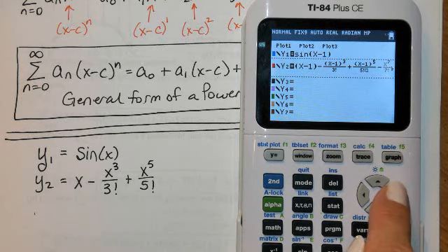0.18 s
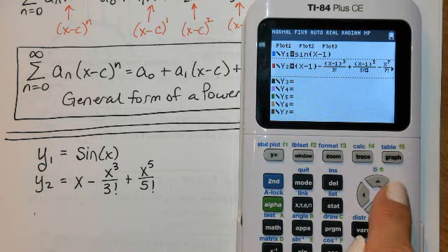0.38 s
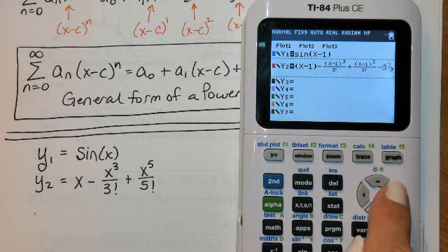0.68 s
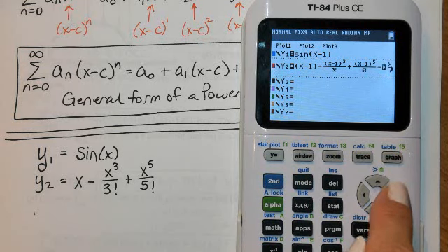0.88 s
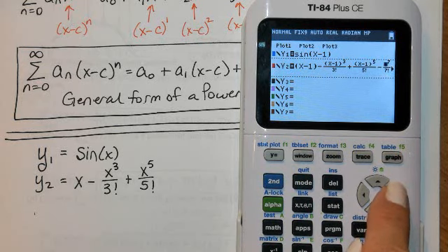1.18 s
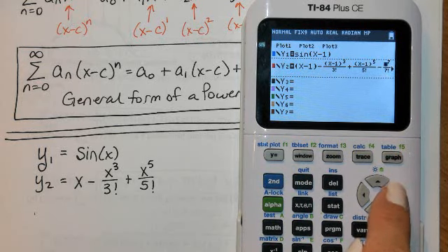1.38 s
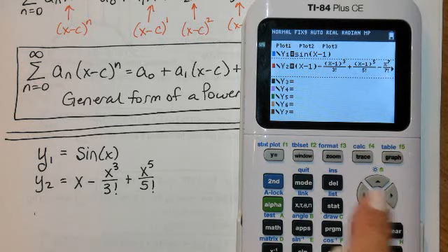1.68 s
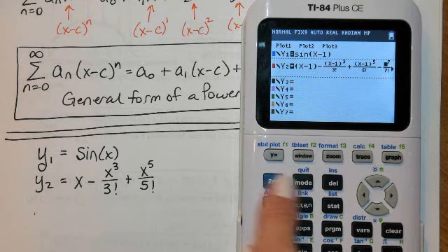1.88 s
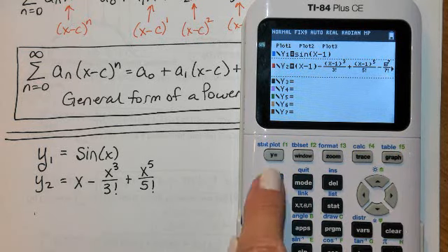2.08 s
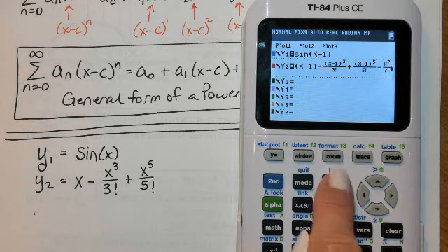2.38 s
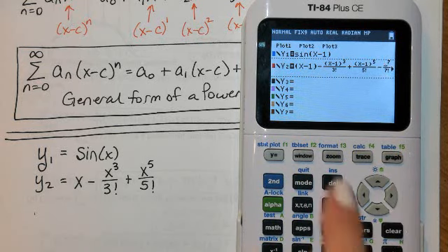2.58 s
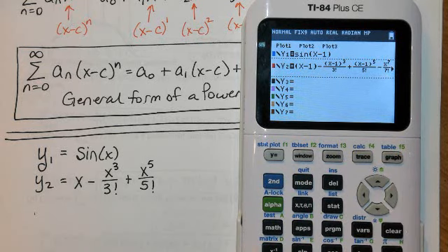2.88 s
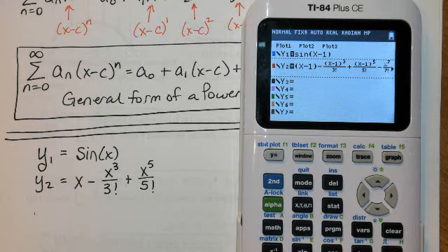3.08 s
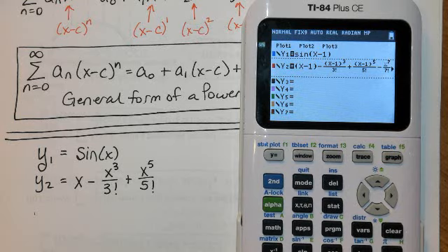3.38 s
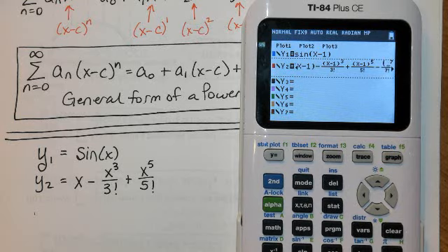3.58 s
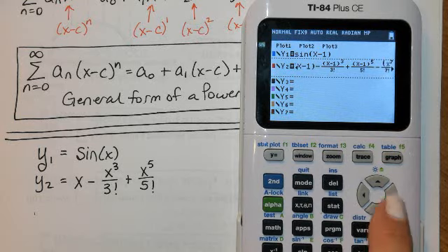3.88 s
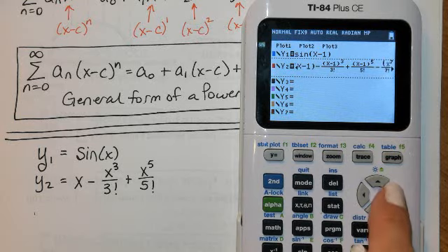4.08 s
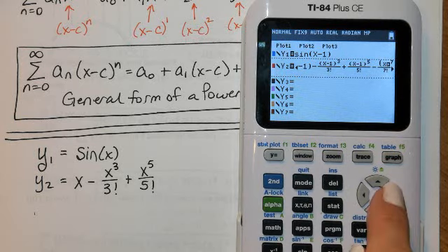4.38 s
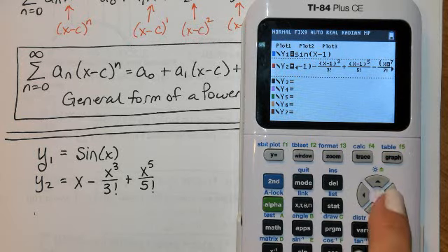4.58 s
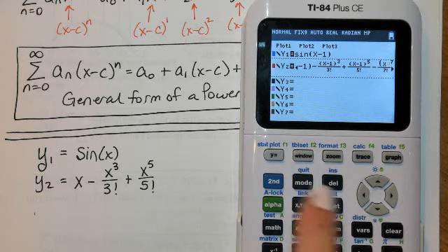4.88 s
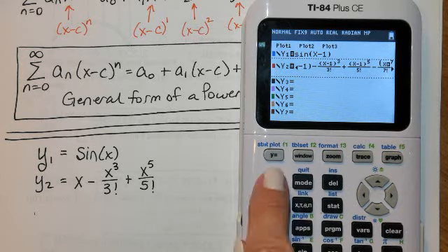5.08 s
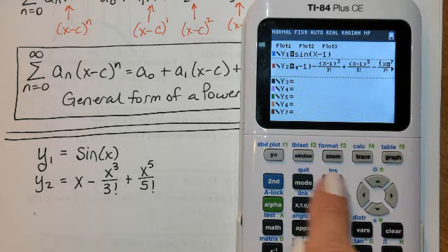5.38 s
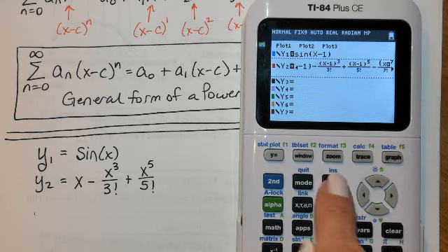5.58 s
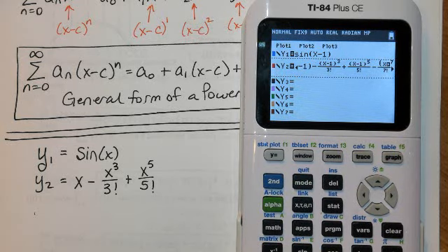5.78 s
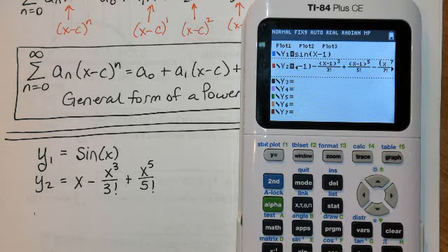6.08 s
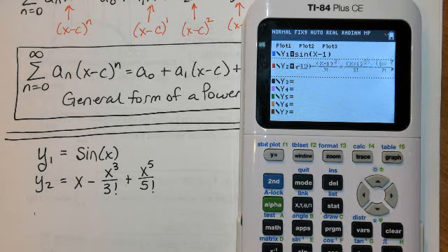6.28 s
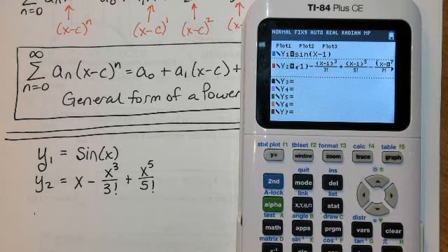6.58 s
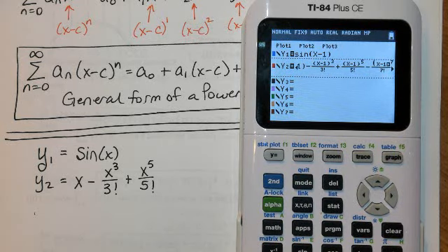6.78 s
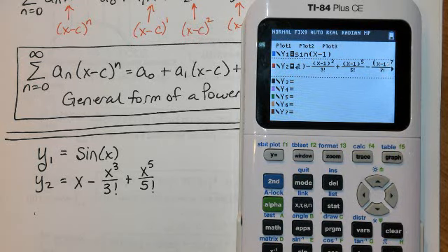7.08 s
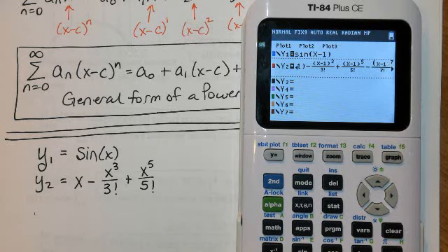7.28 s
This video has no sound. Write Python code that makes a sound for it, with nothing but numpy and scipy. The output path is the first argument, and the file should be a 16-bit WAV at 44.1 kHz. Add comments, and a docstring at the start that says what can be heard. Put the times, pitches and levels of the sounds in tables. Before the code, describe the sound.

Irregular plastic clicks of calculator keys, two of them sharp snaps, with soft desk bumps over a low room hum.

```python
"""A thumb works a plastic calculator lying on paper on a desk, heard through a narrow-band microphone.
Ventilation rumbles and mains power hums in the small room throughout. First the arrow pad clicks lightly.
At 2.6 s a key springs back hard: it snaps, rings its cap and knocks the hollow case as the desk is bumped.
More light clicks follow, then a second firm snap at 5.6 s. At the end the hand brushes the paper,
bumps the desk once more and rocks a few keys in their seats."""
import sys
import numpy as np
from scipy import signal
from scipy.fft import rfft, irfft
from scipy.io import wavfile
from scipy.ndimage import uniform_filter1d

SR = 44100
rng = np.random.default_rng(int(sys.argv[2]) if len(sys.argv) > 2 else 0)


def wrap_up_sound(samples):
    """Save the sound to the file named by the first command line argument, as 16-bit audio."""
    columns = np.atleast_2d(samples).T
    # keep every value between -1 and 1, then stretch to whole-number steps
    tamed = np.clip(columns, -1, 1)
    steps = np.round(tamed * 32767).astype(np.int16)
    wavfile.write(sys.argv[1], SR, steps)


N = 326727

# ventilation rumble and microphone hiss: (frequency [Hz], level [dB per Hz])
AIR_SPECTRUM = [(8, -45.5), (22, -55.5), (31, -66), (45, -64), (54, -61.5), (63, -73.5), (75, -75.5),
                (110, -78.5), (165, -78.5), (270, -87.5), (430, -90), (650, -94), (1500, -98),
                (2100, -99.6), (5000, -99.3), (7500, -99.8), (12000, -115)]
# the hand bumps the desk: (time [s], pitch [Hz], level [dB])
DESK_BUMPS = [(1.218, 189, -52), (2.596, 181, -40.5), (2.596, 344, -41.5), (2.674, 110, -39),
              (4.28, 124, -43.5), (5.09, 233, -46), (5.492, 244, -37), (5.635, 147, -42.5),
              (6.238, 129, -33)]
# skin slides over paper and keys: (middle time [s], length [s], centre [Hz], width [Hz], level [dB])
SKIN_BRUSHES = [(2.406, 0.11, 4460, 6000, -54), (4.96, 0.12, 480, 90, -56.5), (4.944, 0.081, 233, 100, -54),
                (4.948, 0.071, 1490, 2500, -58.5), (5.283, 0.056, 4000, 5000, -48.5),
                (6.238, 0.067, 3530, 4500, -53), (6.397, 0.033, 2830, 2980, -54),
                (6.601, 0.066, 1300, 900, -60.5), (6.743, 0.13, 3000, 5000, -60)]
# the four parts of a click, a row each for snap, bright ring, key cap and case: (low [Hz], high [Hz])
PART_BANDS = [(3900, 6400), (6400, 7400), (1800, 3900), (400, 1800)]
# the tones the calculator rings with: (pitch [Hz], relative level [dB], time to fade by 60 dB [s])
RING_TONES = [(466, -1, 0.033), (616, -5, 0.024), (811, -2.5, 0.015), (957, -1.5, 0.057), (1100, -8, 0.045),
              (1280, -5, .022), (1430, -2.5, 0.027), (1730, -3.5, 0.034), (2283, -2, 0.024),
              (2630, -5, 0.023), (3076, -5, 0.04), (3487, -0.5, 0.032), (4200, 2.5, 0.014),
              (4540, -6, 0.017), (4950, -2, 0.025), (5370, -2.5, 0.023), (5650, -2.5, 0.018),
              (6190, -8, 0.045), (6780, -4.5, 0.027), (7060, -11, 0.039)]
# the thumb lands on keys and rocks them: (time [s], level [dB])
KEY_TOUCHES = [(2.392, -52), (2.406, -52), (2.4142, -53.5), (3.6057, -53), (6.232, -50), (6.2374, -53),
               (6.3907, -41.5), (6.603, -55), (6.705, -60)]
# a key meets its stop and knocks the case:
# (time [s], level [dB], pitch [Hz], cap gain [dB], treble gain [dB], gain below the pitch [dB])
CASE_KNOCKS = [(0.688, -52.5, 1330, -0.5, -3, -4.5), (2.596, -42, 1200, 6, 5, -1.5),
               (3.615, -53, 1390, 4, 7.5, -1.5), (4.2719, -47.5, 1250, -6, -13, -0.5),
               (4.2762, -52, 1050, -12, -19, -3), (5.282, -55, 1390, -9.5, -21, -3),
               (5.477, -49, 950, -22, -22, 0), (5.4966, -46, 920, -2, -12, -3),
               (5.634, -42, 960, 11.5, -6, -6), (6.766, -57.5, 750, -1, 4, -6)]
# light clicks, mostly of the arrow pad: (time [s], level [dB], tick over the ring [dB], cap gain [dB])
LIGHT_CLICKS = [(.0052, -43.5, 11, 1.5), (0.2446, -39.5, 3.5, -0.5), (0.519, -40.5, 4, -2.5),
                (.765, -47.5, 0, 0), (0.7672, -42.5, 6.5, -1.5), (1.213, -47.5, -9, -4.5),
                (1.2207, -44, 5, -2.5), (1.2545, -51, 0, -3), (4.27, -45.5, -5, -11), (4.496, -53, 7, 0),
                (4.5096, -50.5, 4, -7), (5.0888, -45, -4, -5), (5.4753, -48, 0, -12)]
# a key springs back up and rebounds once:
# (time [s], level [dB], knock pitch [Hz], lowest snap pitch [Hz], rebound delay [s], rebound level [dB])
KEY_RELEASES = [(2.2011, -42.5, 1250, 3940, 0.018, -50.5), (2.5987, -26, 1100, 4500, 0.0094, -44),
                (5.2803, -40.5, 1380, 3780, .0185, -50), (5.6363, -31, 930, 4510, 0.0082, -44)]

# the mix of parts in each kind of contact: (snap [dB], bright ring [dB], key cap [dB], case [dB])
TOUCH_MIX = (2, -2.5, -8, -8.5)
KNOCK_MIX = (-8.5, -11.5, -5.5, 2.5)
ARROW_MIX = (0.5, -2.5, -4.5, -18)
RELEASE_MIX = (5, 8, -13, -14.5)
REBOUND_MIX = (1.5, 2, -15.5, -6)


def gain(db):
    """Turn decibels into a number to multiply by."""
    return 10 ** (np.asarray(db) / 20)


def seconds(length):
    """The time of each sample in a short sound."""
    return np.arange(int(length * SR)) / SR


def fade(t, fade_s):
    """Die away smoothly, 60 dB down after fade_s."""
    return np.exp(-np.log(1000) * t / fade_s)


def band(x, low_hz, high_hz, order=2):
    """Let through the frequencies between two limits."""
    sections = signal.butter(order, [low_hz, min(high_hz, .45 * SR)], "band", fs=SR, output="sos")
    return signal.sosfilt(sections, x)


def unit_energy(x):
    """Scale a short sound to an energy of one."""
    return x / np.sqrt(np.sum(x ** 2))


def drift(rate_hz):
    """A slow random wander around zero."""
    step = int(SR / rate_hz)
    return 1.64 * uniform_filter1d(np.repeat(rng.standard_normal(N // step + 1), step), step)[:N]


def add(track, start, sound):
    """Mix a sound into the track at a time in seconds."""
    i = max(int(start * SR), 0)
    track[i:i + len(sound)] += sound[:N - i]


def shape_tone(x, curve, size=8192):
    """Filter along (frequency [Hz], gain [dB]) points, keeping the start sharp (minimum phase)."""
    hz, db = np.transpose(sorted(curve))
    bin_hz = np.maximum(np.arange(size // 2 + 1) * SR / size, 1)
    cepstrum = irfft(np.log(gain(np.interp(np.log(bin_hz), np.log(hz), db))))
    cepstrum[1:size // 2] *= 2
    cepstrum[size // 2 + 1:] = 0  # nothing may ring before the hit
    return irfft(rfft(x, size) * np.exp(rfft(cepstrum)))[:len(x)]


def ventilation(swell_db=0.96, split_hz=600):
    """Moving air rumbles and swells a little, under a steady microphone hiss."""
    hz, db = np.transpose(AIR_SPECTRUM)
    bin_hz = np.maximum(np.arange(N // 2 + 1) * SR / N, 1)
    bin_db = np.interp(np.log(bin_hz), np.log(hz), db)
    spectrum = rfft(rng.standard_normal(N)) * gain(bin_db) * np.sqrt(SR / 2)
    low_share = 1 / (1 + (bin_hz / split_hz) ** 2)
    rumble = irfft(spectrum * low_share, N)
    hiss = irfft(spectrum * (1 - low_share), N)
    return rumble * gain(swell_db * drift(6.7)) + hiss


def hum(mains_hz=60.02, slip_hz=0.915, mains_db=-48.5, motor_db=-56.5):
    """Mains hum and a slightly slower motor slide in and out of step, so the sum slowly throbs."""
    t = np.arange(N) / SR - 0.25  # roughly in step at 0.25 s
    mains = gain(mains_db) * np.sin(2 * np.pi * mains_hz * t)
    motor = gain(motor_db) * np.sin(2 * np.pi * (mains_hz - slip_hz) * t + 0.31 * drift(1.1))
    return np.sqrt(2) * (mains + motor)


def room(x, echo_db=-22.5, fade_s=0.13, build_s=0.011):
    """The desk and near walls add a short, blurred echo."""
    t = seconds(.35)
    build_up = np.clip(t / build_s - .5, 0, 1)
    echo = band(rng.standard_normal(len(t)), 350, 8000, order=1) * fade(t, fade_s) * build_up
    return x + gain(echo_db) * signal.fftconvolve(x, unit_energy(echo))[:N]


def desk_bumps(push_s=0.0091, fade_cycles=16.7):
    """A soft hand pushes slowly, so the desk answers only with a low tone."""
    out, t = np.zeros(N), seconds(.3)
    push = 1 - np.exp(-t / push_s)
    for start, hz, db in DESK_BUMPS:
        add(out, start, gain(db) * np.sin(2 * np.pi * hz * t) * fade(t, fade_cycles / hz) * push)
    return out


def skin_brushes(grain_db=3.5):
    """Sliding skin makes a swell of tiny slips of uneven size."""
    out = np.zeros(N)
    for middle, length, hz, width, db in SKIN_BRUSHES:
        count = int(length * SR)
        slips = rng.standard_normal(count) * gain(grain_db * rng.exponential(size=count))
        low_hz = np.hypot(hz, width / 2) - width / 2
        rub = band(slips, low_hz, low_hz + width)
        add(out, middle - length / 2, gain(db) * rub / rub.std() * np.hanning(count))
    return out


def rattle(grain_db=6.0, rise_s=0.008, fade_s=0.24):
    """Loose keys shiver in the case: many tiny contacts that die away."""
    t = seconds(.25)
    contacts = rng.standard_normal(len(t)) * gain(grain_db * rng.exponential(size=len(t)))
    grains = band(contacts, 550, 6200, order=1)
    return grains / grains.std() * fade(t, fade_s) * (1 - np.exp(-t / rise_s))


def plastic_ring(t, detune=0.014, scatter_db=1.5):
    """Struck plastic rings with many short tones, a little different on every hit."""
    hz, db, fade_s = np.transpose(RING_TONES)
    shift, strength, direction = rng.standard_normal((3, len(hz)))
    waves = np.sin(2 * np.pi * np.outer(hz * (1 + detune * shift), t))
    sizes = np.sign(direction) * gain(db + scatter_db * strength)
    tones = sizes[:, None] * waves * fade(t, fade_s[:, None])
    ring = np.zeros(len(t))
    for low, high in PART_BANDS:
        part = tones[(hz >= low) & (hz < high)].sum(axis=0)
        ring += unit_energy(part) * np.sqrt(2 * (high - low) / SR)  # wider bands get more energy
    return ring


def key_hit(tick_db, buckle_s=0.00079, grit_db=-3.0):
    """A hard tick, a burst of grit as the springy dome under the key buckles, and the ring after it."""
    t = seconds(.08)
    tick = gain(tick_db) * signal.unit_impulse(len(t))
    ring = plastic_ring(t)
    swell_s = buckle_s * gain(-0.34 * tick_db)  # a blunt contact buckles more slowly
    grit = gain(grit_db) * unit_energy(rng.standard_normal(len(t)) * t * np.exp(-t / swell_s))
    combined_size = np.sqrt(1 + gain(tick_db) ** 2 + gain(grit_db) ** 2)
    return (ring + tick + grit) / combined_size


def click(mix_db, knock_hz, snap_hz, tick_db, knock_db=5.0, below_knock_db=-4.0,
          valley_db=-4.5, cap_peak_db=1.5, snap_edge_db=3.0):
    """One key hit with its own tone: where the thumb sits decides how strongly each part answers."""
    widths_hz = np.diff(PART_BANDS)[:, 0]
    snap, bright, cap, case = np.asarray(mix_db) + 10 * np.log10(SR / 2 / widths_hz)
    curve = [
        (100, case - 14), (330, case - 7),
        (0.72 * knock_hz, case + below_knock_db), (knock_hz, case + knock_db),
        (1800, min(case, cap) + valley_db),  # valley between case and cap
        (2300, cap - cap_peak_db), (3000, cap + cap_peak_db), (3500, cap),
        (max(0.83 * snap_hz, 3600), min(cap, snap) - 10),  # valley between cap and snap
        (snap_hz, snap + snap_edge_db), (5500, snap), (6300, snap),
        (6900, bright), (7400, bright), (9000, bright - 9), (10800, bright - 9), (13000, bright - 36)]
    return shape_tone(key_hit(tick_db), curve) * np.sqrt(.005 * SR)  # level as if spread over 5 ms


def key_touches():
    """Keys rock under the thumb with broad, loose clicks."""
    out = np.zeros(N)
    for start, db in KEY_TOUCHES:
        add(out, start, gain(db) * click(TOUCH_MIX, knock_hz=1420, snap_hz=4590, tick_db=-1.5))
    return out


def case_knocks():
    """A key meets its stop and knocks the hollow case; hard contacts add more cap and treble."""
    out = np.zeros(N)
    snap, bright, cap, case = KNOCK_MIX
    for start, db, knock_hz, cap_db, treble_db, body_db in CASE_KNOCKS:
        mix_db = (snap + treble_db, bright + treble_db, cap + cap_db, case)
        knock = click(mix_db, knock_hz, snap_hz=4340, tick_db=-5,
                      knock_db=3, below_knock_db=body_db, valley_db=0)
        add(out, start, gain(db) * knock)
    return out


def arrow_pad():
    """Light presses snap and ring the key cap, but barely stir the case."""
    out = np.zeros(N)
    snap, bright, cap, case = ARROW_MIX
    for start, db, tick_db, cap_db in LIGHT_CLICKS:
        mix_db = (snap, bright, cap + cap_db, case)
        press = click(mix_db, knock_hz=1260, snap_hz=5500, tick_db=tick_db,
                      valley_db=-12, cap_peak_db=0.1)
        add(out, start, gain(db) * press)
    return out


def key_releases(firm_db=-28, rattle_db=-22):
    """A key springs up with a bright snap, a weaker, blunt rebound and a short rattle."""
    out = np.zeros(N)
    for start, db, knock_hz, snap_hz, rebound_s, rebound_db in KEY_RELEASES:
        force_db = db - firm_db
        hollow_db = np.array([0, 0, 0, -0.66 * force_db])  # gentler: a larger share of hollow case
        tick_db = 2 + 0.9 * force_db  # harder: a sharper tick
        snap = click(RELEASE_MIX + hollow_db, knock_hz, snap_hz, tick_db,
                     knock_db=-0.5, valley_db=-1.0, snap_edge_db=-1.5)
        rebound = click(REBOUND_MIX + hollow_db, knock_hz, snap_hz, tick_db=-16, snap_edge_db=-1.5)
        add(out, start, gain(db) * snap)
        add(out, start + rebound_s, gain(rebound_db) * rebound)
        add(out, start, gain(db + rattle_db) * rattle())
    return out


def scene():
    """Keys, desk and hand sound in the room, over ventilation and hum, in one channel."""
    keys = arrow_pad() + key_releases() + key_touches() + case_knocks()
    return (room(keys + desk_bumps() + skin_brushes()) + ventilation() + hum())[None]


def record(dry, cut_hz=7230, mirror_hz=16000, leak_db=-44.5):
    """The microphone cuts steeply above the speech band; a faint mirrored copy of the treble leaks in."""
    faded = dry * signal.windows.tukey(N, .001)  # very short fades at both ends
    speech_band = signal.sosfilt(signal.ellip(8, .3, 46, cut_hz, fs=SR, output="sos"), faded)
    mirrored = 2 * speech_band * np.cos(2 * np.pi * mirror_hz * np.arange(N) / SR)
    return speech_band + gain(leak_db) * band(mirrored, 8600, 11200, order=3)


dry = scene()
out = record(dry)
wrap_up_sound(out)
```